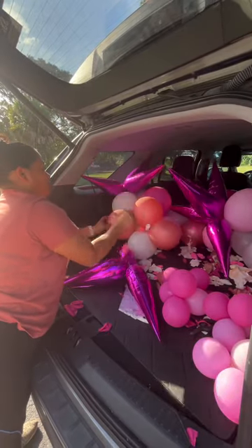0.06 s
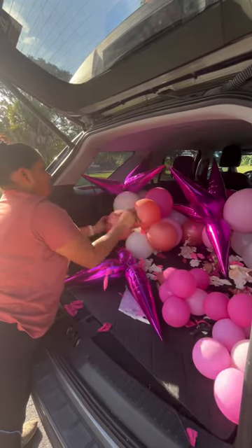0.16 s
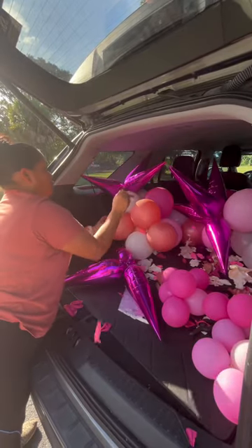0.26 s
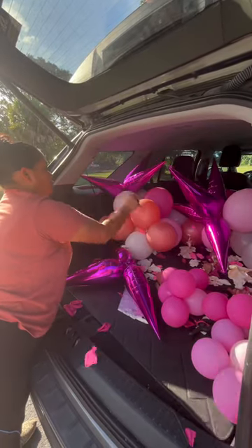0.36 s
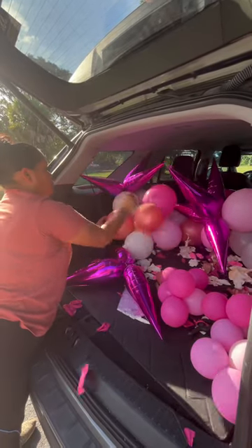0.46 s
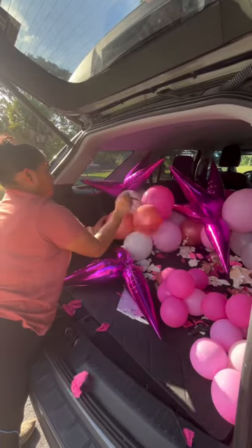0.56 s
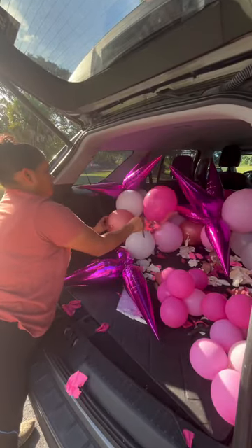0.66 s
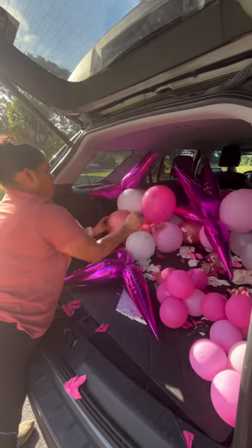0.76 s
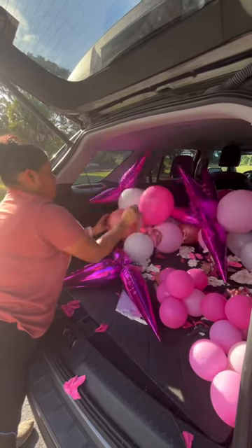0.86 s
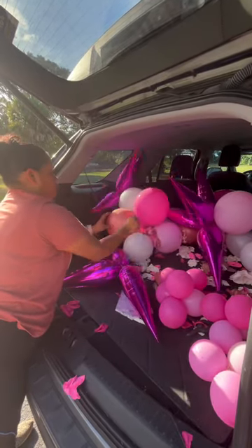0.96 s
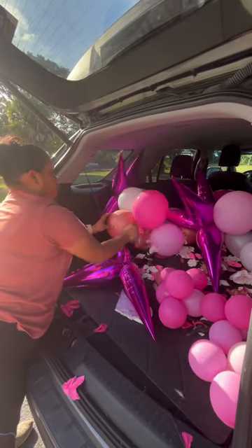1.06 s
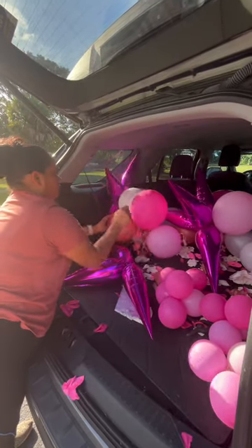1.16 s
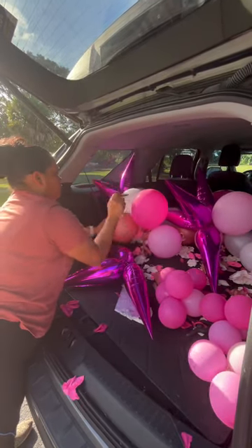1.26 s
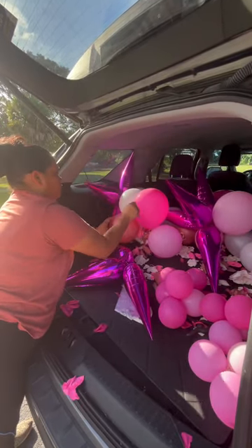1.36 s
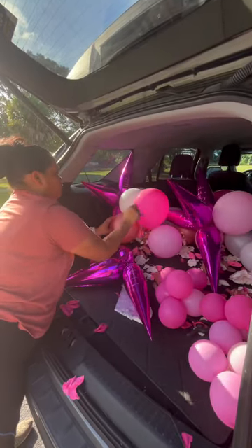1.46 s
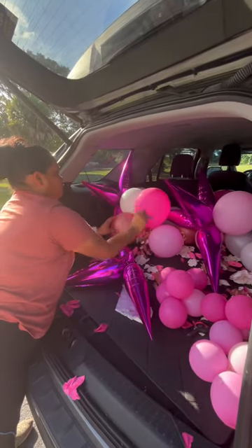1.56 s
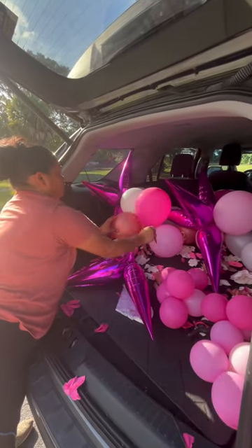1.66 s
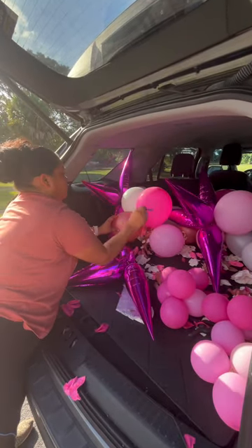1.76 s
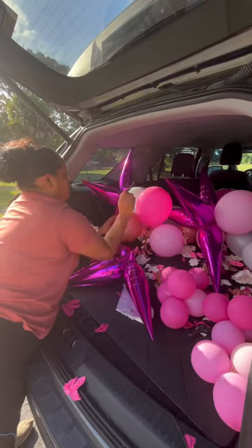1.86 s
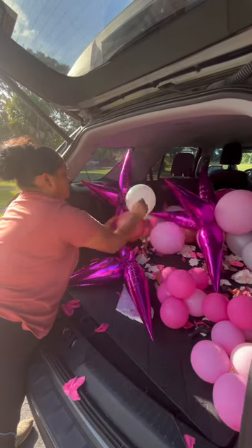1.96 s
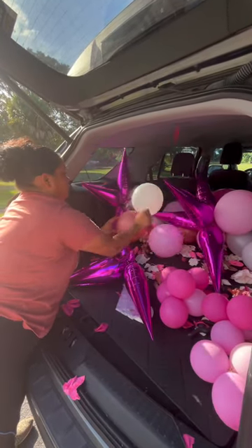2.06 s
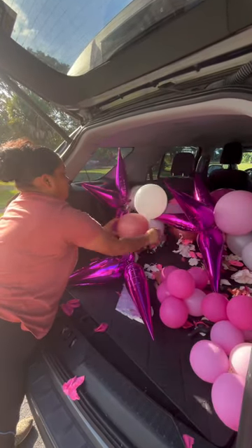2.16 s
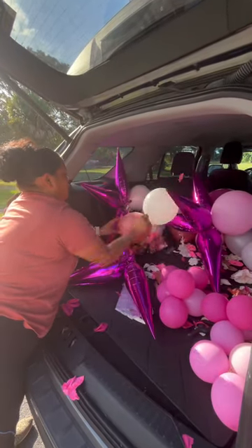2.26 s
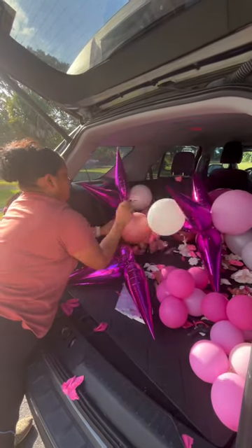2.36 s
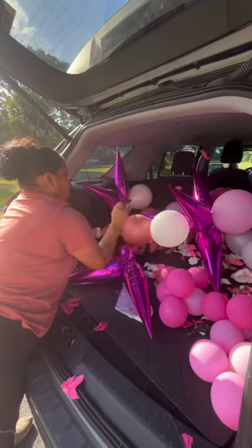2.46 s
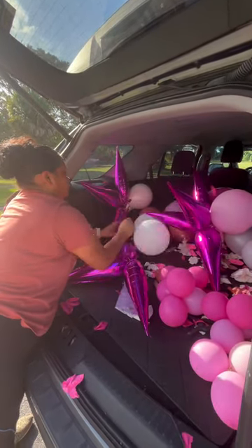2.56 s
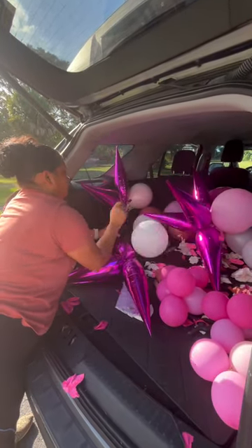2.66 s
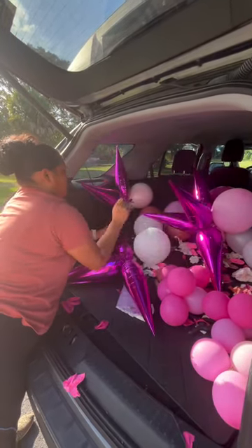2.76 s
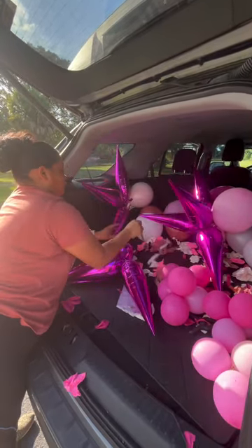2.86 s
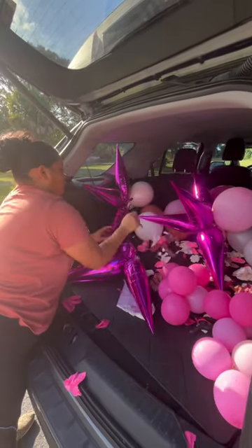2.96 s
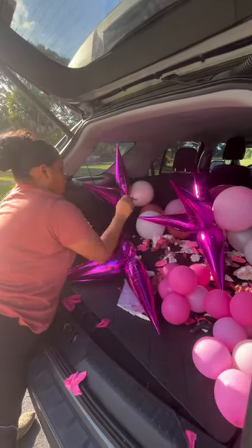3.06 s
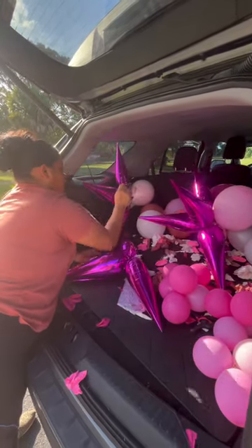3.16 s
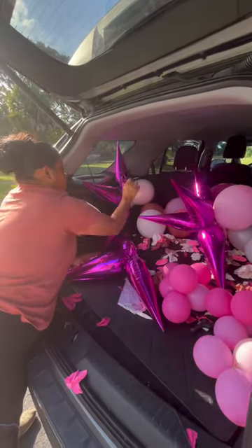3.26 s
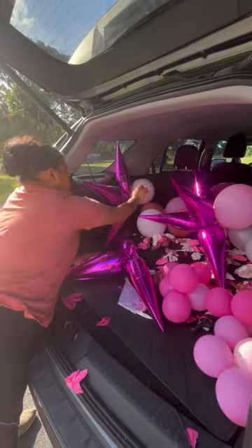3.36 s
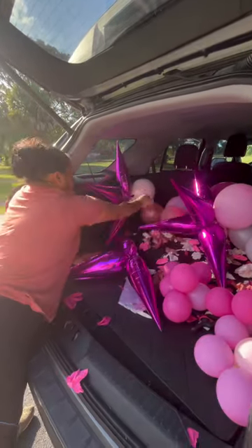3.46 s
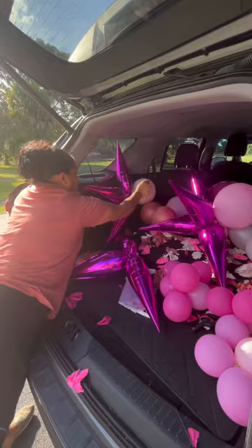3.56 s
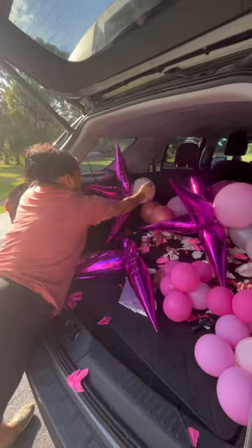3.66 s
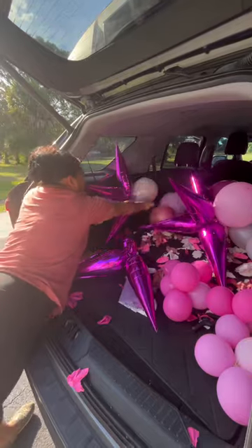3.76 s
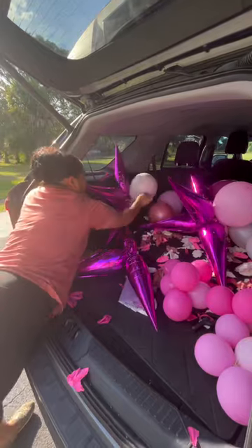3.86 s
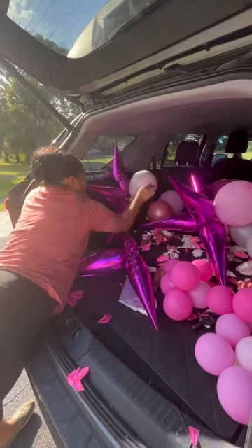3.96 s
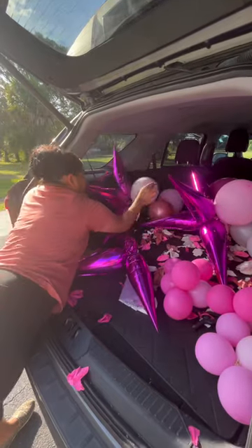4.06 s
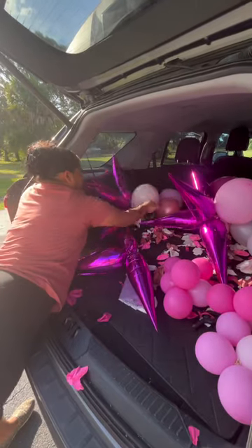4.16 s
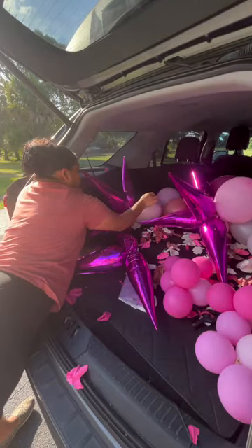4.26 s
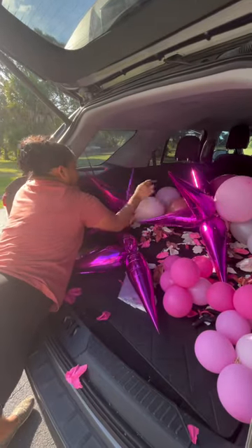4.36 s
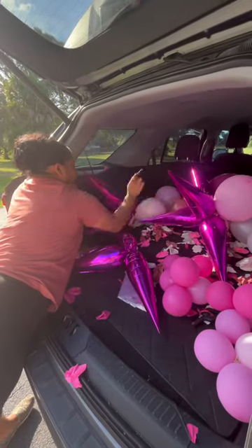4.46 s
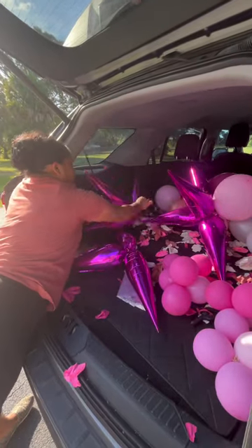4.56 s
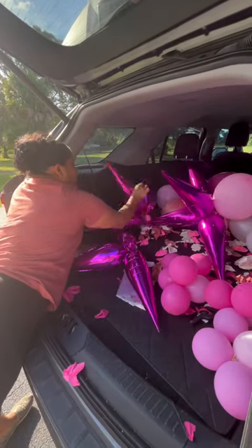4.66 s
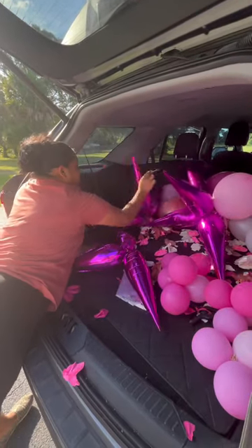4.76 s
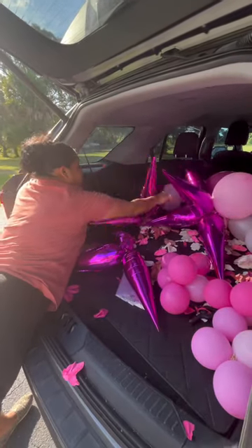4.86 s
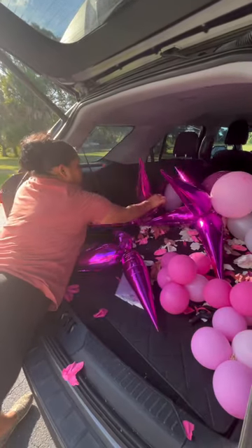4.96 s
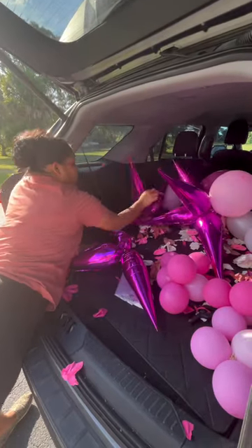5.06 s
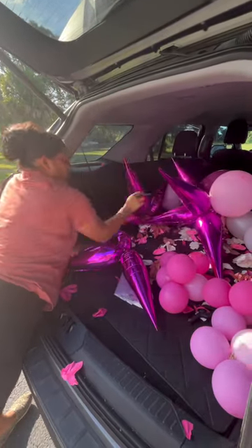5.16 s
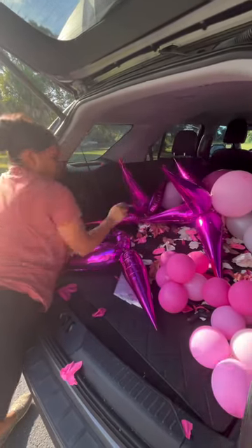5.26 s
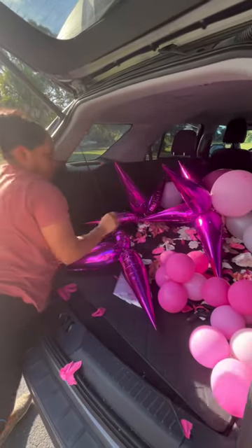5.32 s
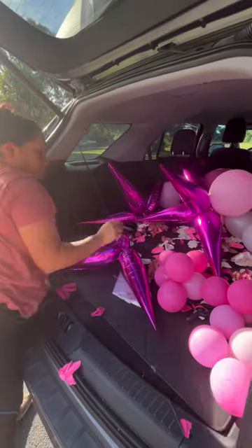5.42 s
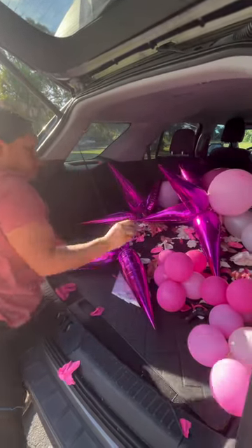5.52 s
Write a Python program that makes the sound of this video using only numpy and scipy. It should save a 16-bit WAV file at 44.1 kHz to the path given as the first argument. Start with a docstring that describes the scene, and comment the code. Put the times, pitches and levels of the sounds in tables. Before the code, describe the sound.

Close to the microphone, twelve balloons are popped in the open trunk of a car outdoors. Four bangs come in the first second, then a pause, then the rest at uneven gaps. Each is a sharp crack with a low thump and a brief hollow ring. Faint foil crinkles and scrap ticks lie between, over very quiet outdoor air and low hum.

```python
"""Open trunk of a car, outdoors: twelve latex balloons burst near a recorder with widened stereo.
Each burst: noise shaped into a short roar, a pressure thump, balloon rings, trunk decay, cabin boom.
Foil and rubber scraps: hiss and short resonant ticks, the hiss stirred by the bursts.
Background: patchy noise for outdoor air, two wavering low tones for the hum."""
import sys
import numpy as np
from scipy import signal
from scipy.fft import rfft, irfft, next_fast_len
from scipy.io import wavfile
from scipy.ndimage import uniform_filter1d

SR = 44100
rng = np.random.default_rng(int(sys.argv[2]) if len(sys.argv) > 2 else 0)


def persist_wave(psi):
    """Save psi, clipped to +-1, as 16-bit WAV."""
    counts = np.round(np.clip(psi, -1, 1) * 32767).astype(np.int16)
    wavfile.write(sys.argv[1], SR, np.atleast_2d(counts).T)


N = 246519

# hum tones: [f/Hz, width per resonance stage/Hz]
HUM_TONES = [(57, 13), (109, 20)]
# upper hum over time: [t/s, level/dB]
UPPER_HUM_LEVEL = [(0, -56), (1, -54.5), (1.8, -52.5), (2.3, -61), (3.4, -61), (4.2, -75.5), (5.2, -66.5),
                   (5.59, -55)]
# outdoor air spectrum: [f/Hz, relative level/dB per Hz]
AIR_SPECTRUM = [(30, -7), (80, -3.5), (170, -15.5), (400, -16), (700, -15), (1000, -19.5), (1600, -29),
                (2600, -37), (5000, -46.5), (9000, -64), (14000, -74)]
# foil spectrum: [f/Hz, relative level/dB per Hz]
FOIL_SPECTRUM = [(1500, -5.5), (2500, -1.5), (4000, -5.5), (6500, -7), (10000, -18), (13000, -18.5),
                 (15500, -26.5)]
# foil under the hands: [t/s, level/dB]
RUSTLE_LEVEL = [(0.0, -68.5), (1.04, -59.5), (1.6, -85.5), (1.88, -74), (2.1, -67), (2.3, -75.5),
                (2.55, -69), (2.74, -69.5), (2.88, -68), (3.08, -84), (3.22, -83), (4.2, -64), (4.61, -65),
                (4.76, -63.5), (5.04, -77.5), (5.59, -73)]
# ticks of foil and scraps: [t/s, peak level/dB, centre f/Hz, t60/s, share of broad crackle/1]
TICKS = [(0.298, -51.5, 6000, 0.052, .6), (0.317, -46.5, 2450, 0.047, 1.2), (1.16, -42, 1200, 0.081, 0.16),
         (2.289, -48, 7490, 0.0077, .4), (2.723, -50, 2040, .04, 0.69), (2.918, -31, 2600, 0.047, 0.79),
         (3.049, -49, 3560, .06, 0.51), (3.111, -50, 7300, .012, .6), (3.819, -44, 7740, 0.13, 0.65),
         (3.871, -46, 6700, .036, 0.72), (4.054, -46.5, 6080, .043, 1.2), (4.119, -37.5, 2190, .075, 2.3),
         (4.251, -46.5, 6700, .028, .8), (5.032, -51.5, 2020, 0.058, 0.36),
         (5.309, -52.5, 2443, 0.065, 0.51), (5.439, -52.5, 2020, .045, 0.56)]
# bursts: [t/s, crack level/dB, thump level/dB, ring f/Hz, ring level/dB, ring t60/s, upper ring f/Hz,
#   upper ring level/dB, top ring f/Hz, top ring level/dB, treble tilt/dB per octave, tail re crack/dB]
POPS = [(0.0485, -13, -16, 385, -13.5, 0.17, 1230, -7.5, 2700, -26, 0.7, -2.5),
        (0.38, -16.5, -9.5, 401.4, -16, 0.19, 730, -12.5, 3020, -22, 0.7, 0),
        (0.6416, -13.5, -10, 395, -10.5, 0.21, 1430, -13, 2534, -26, 0.75, -2.5),
        (0.9918, -13, -14, 489, -12, 0.084, 939, -25, 2720, -15.5, -0.2, -4.5),
        (1.9306, -10, -10, 303, -24, 0.12, 1567, -10.5, 2630, -19, 0.1, -6.5),
        (2.095, -13, -14, 349, -19, 0.09, 904, -12.5, 1405, -14.5, 1.1, -6.5),
        (2.5193, -15, -10.5, 423.3, -8, 0.16, 1000, -18.5, 2070, -14.5, 0.8, 0),
        (2.8589, -13.5, -20.5, 437.4, -6.5, 0.078, 883, -11.5, 2950, -19.5, 0.2, -4.5),
        (3.414, -12.5, -12.5, 437.4, -12, 0.08, 1740, -13, 3000, -15.5, 0.76, -6.5),
        (3.742, -14, -11, 410, -9, 0.11, 1432, -15.5, 2933, -21, -0.46, -6.5),
        (4.5565, -13, -13.5, 416, -10.5, 0.09, 1945, -8.5, 947, -16.5, 0.15, -9),
        (4.875, -17, -12.5, 399, -10.5, 0.07, 930, -17.5, 2895, -21.5, 2.5, -2)]
# burst noise spectrum: [f/Hz, relative level/dB per Hz]
CRACK_SPECTRUM = [(150, -9), (400, 2.5), (650, -2.5), (1000, -11), (1600, -12.5), (2500, -14.5),
                  (4000, -17.5), (6500, -20.5), (10000, -29), (13000, -30), (15500, -31.5)]
# trunk decay: [f/Hz, t60/s]
TRUNK_T60 = [(60, 0.21), (160, 0.053), (420, 0.15), (1100, 0.11), (3000, 0.12), (7000, 0.11),
             (13000, 0.024)]
# trunk resonances: [f/Hz, width/Hz]
PANELS = [(950, 90), (2730, 300), (3570, 100), (4120, 80), (4980, 80), (5750, 100), (7000, 120)]
# left channel's phase lead, before the channel factors: [f/Hz, lead/rad]
CHANNEL_LEAD = [(0, 0), (430, -0.6), (1120, -6.8), (1980, -5.5), (2330, -8.2), (2580, -8.1), (4820, -9.9),
                (6290, -9.0), (9560, -3.4), (10900, -2.7), (12000, -0.1), (13500, 0.5), (14100, 2.9),
                (16200, 3.4)]
# left minus right, before the balance factor: [f/Hz, level/dB]
CHANNEL_BALANCE = [(60, 0.0), (110, 0.5), (200, 1.5), (380, 4.0), (700, 1.5), (1290, 0.0), (2380, -0.5),
                   (4400, -2.5), (8120, 0.0), (15000, 0.0)]
# likeness of the channels, bursts: [f/Hz, likeness/1]
LIKENESS_NEAR = [(400, 0.99), (800, 0.48), (1500, .85), (2500, 0.14), (5000, 0.69), (8000, 0.16),
                 (10000, 1), (15000, 0.31)]
# likeness of the channels, all else: [f/Hz, likeness/1]
LIKENESS_FAR = [(60, 0.98), (350, 0.97), (700, 0.51), (2000, 0.083), (5000, 0.57), (8000, .35), (11000, 1)]

LOW_HUM_DB, AIR_DB = -58.5, -54
SETTLE_DB, SETTLE_T60_S = -72.5, 3.3  # scraps stir after every burst
FADE_IN_S, RISE_S = 0.006, 0.004  # fade-in before the burst time; rise to the burst's peak after it
BODY_DB = -0.5  # near 1 kHz
ECHO_S, ECHO_DB, ECHO_SPREAD_S = 0.0092, -10, 0.018  # reflection from the front of the cabin
BOOM_RE_THUMP_DB, BOOM_T60_S = -23.5, 0.31
BAND_EDGE_HZ = 16640


def gain_of(db):
    """Decibels to gain."""
    return 10 ** (np.asarray(db) / 20)


def evened(x):
    """Scales to rms 1."""
    return x / np.sqrt(np.mean(x ** 2) + 1e-20)


def read(points, hz):
    """Interpolates a table over log frequency."""
    f, value = np.transpose(points)
    return np.interp(np.log(hz + 1), np.log(f + 1), value)


def curve(rows):
    """A dB curve over time, as gain."""
    return gain_of(np.interp(np.arange(N) / SR, *np.transpose(rows)))


def add(mix, start_s, sound):
    """Mixes a sound in from start_s."""
    part = mix[:, round(start_s * SR):][:, :sound.shape[1]]
    part += sound[:, :part.shape[1]]


def shaped(x, gain):
    """Filters by a function of frequency, real or complex."""
    size = next_fast_len(x.shape[-1] + 4096)
    spectrum = rfft(x, size) * gain(np.fft.rfftfreq(size, 1 / SR))
    return irfft(spectrum, size)[..., :x.shape[-1]]


def resonate(x, hz, width_hz):
    """Resonance of peak gain 1: shift to 0 Hz, one-pole lowpass, shift back."""
    turn = np.exp(2j * np.pi * hz * np.arange(x.shape[-1]) / SR)
    r = np.exp(-np.pi * width_hz / SR)
    return 2 * (turn * signal.lfilter([1 - r], [1, -r], x / turn)).real


def resonate_twice(x, hz, width_hz):
    """Two equal resonances in series: steeper skirts."""
    return resonate(resonate(x, hz, width_hz), hz, width_hz)


def hum():
    """Two wavering low tones, as from an idling engine some way off: narrow noise plus a steady sine."""
    out = np.zeros((2, N))
    levels = gain_of(LOW_HUM_DB), curve(UPPER_HUM_LEVEL)
    for level, (hz, width_hz) in zip(levels, HUM_TONES):
        lumps = evened(resonate_twice(rng.standard_normal((2, N)), hz, width_hz))
        tone = np.sin(2 * np.pi * (hz * np.arange(N) / SR + rng.random()))
        out += level * (0.9 * lumps + 0.57 * tone * [[1], [0]])  # sine in the shared part only
    return out


def wash(spectrum_db, patchy_db, flicker_db):
    """Noise with drifting patches and quick flicker across all bands."""
    hz, frame_s, z = signal.stft(rng.standard_normal((2, N)), SR, nperseg=512, noverlap=384)
    patches = uniform_filter1d(rng.standard_normal(z.shape[1:]), 8, 0)
    patches = evened(uniform_filter1d(patches, 20, 1))
    flicker = evened(uniform_filter1d(rng.standard_normal(len(frame_s)), 4))
    z = z * gain_of(spectrum_db(hz)[:, None] + patchy_db * patches + flicker_db * flicker)
    return evened(signal.istft(z, SR, nperseg=512, noverlap=384)[1][:, :N])


def air():
    """Outdoor air: nearly steady noise, strongest in the bass."""
    return gain_of(AIR_DB) * wash(lambda hz: read(AIR_SPECTRUM, hz), patchy_db=0.1, flicker_db=0.1)


def rustle():
    """Foil hiss that follows the hands and is stirred up by every burst."""
    def spectrum_db(hz):
        octaves_below = np.maximum(np.log2(1500 / (hz + 1)), 0)
        return read(FOIL_SPECTRUM, hz) - 12 * octaves_below

    foil = wash(spectrum_db, patchy_db=2.9, flicker_db=2.5)
    since_s = np.arange(N) / SR - np.array(POPS)[:, :1]
    settling = gain_of(SETTLE_DB - 60 * abs(since_s) / SETTLE_T60_S)
    stirred = np.where(since_s > 0, settling, 0).sum(0)
    return foil * np.hypot(curve(RUSTLE_LEVEL), stirred)


def tick(peak_db, hz, t60_s, crisp):
    """A crinkle: decaying noise in clumps through a broad resonance, plus broad crackle."""
    t = np.arange(SR // 10) / SR
    grains = rng.standard_normal((2, len(t))) * gain_of(-60 * t / t60_s) * np.clip(t / 0.001, 0, 1)
    grains *= gain_of(4.5 * evened(uniform_filter1d(rng.standard_normal(len(t)), 50)))  # clumps
    crackle = shaped(grains, lambda f: gain_of(read(FOIL_SPECTRUM, f)) * (f > 1000))
    out = resonate_twice(grains, hz, 0.44 * hz) + crisp * crackle
    return gain_of(peak_db) * out / abs(out).max()


def thump(t):
    """Pressure pulse of the freed air; the lower a frequency, the later it arrives:
    a falling chirp, as from bass-cutting filters."""
    def response(hz):
        late = np.exp(-2j * np.pi * 1.27 * np.log(np.clip(hz, 25, 420) / 420) + 0.8j)
        low_edge = (hz / 110) ** 2.2
        return low_edge / (1 + low_edge) / (1 + (hz / 275) ** 7) * late

    out = shaped(np.exp(-0.5 * ((t - 0.003) / 0.0004) ** 2), response)
    return out / abs(out).max()


def trunk_decay(noise, colour):
    """Grainy trunk decay, each band with its own t60, over faint late echoes from outside."""
    hz, frame_s, z = signal.stft(noise, SR, nperseg=128, noverlap=96)
    trunk = gain_of(-60 * frame_s / read(TRUNK_T60, hz)[:, None])
    patches = uniform_filter1d(rng.standard_normal(z.shape[1:]), 9, 0)
    patches = evened(uniform_filter1d(patches, 4, 1))
    grain = gain_of(3 * patches)  # random patches, louder and softer
    yard = gain_of(-35.5 - 60 * frame_s / 0.91) / (1 + (hz[:, None] / 6000) ** 2)
    z = z * colour(hz)[:, None] * (trunk * grain + yard)
    return signal.istft(z, SR, nperseg=128, noverlap=96)[1][:, :noise.shape[1]]


def cabin_echo(x):
    """Reflection from the front of the cabin, smeared by a burst of noise."""
    lag_s = np.arange(1500) / SR
    scatter = rng.standard_normal((2, 1500)) * np.exp(-0.5 * ((lag_s - ECHO_S) / ECHO_SPREAD_S) ** 2)
    scatter /= np.linalg.norm(scatter[0])
    return gain_of(ECHO_DB) * signal.fftconvolve(x, scatter, axes=1)[:, :x.shape[1]]


def balloon_ring(t, after_s, noise, hz, t60_s):
    """Short sine plus a beating crowd: neighbouring balloons differ a little in size."""
    beats = gain_of(2 * evened(uniform_filter1d(noise[1], 300)))
    tone = np.sin(2 * np.pi * hz * (t - RISE_S) + 0.43) * gain_of(-60 * after_s / 0.042)
    crowd = evened(resonate_twice(noise[0], hz, 95))  # many skins near the same pitch
    swell = 1 - np.exp(-after_s / 0.008)
    return tone + 0.23 * beats * crowd * swell * gain_of(-60 * after_s / t60_s)


def pop(crack_db, thump_db, ring_hz, ring_db, ring_t60_s, upper_hz, upper_db, top_hz, top_db,
        tilt_db, tail_db):
    """One burst: the skin rips in jerks, air rushes out, trunk, cabin and balloons answer."""
    t = np.arange(SR // 2) / SR - FADE_IN_S
    noise = rng.standard_normal((4, len(t)))

    def colour(f):
        body_db = BODY_DB * np.exp(-np.log2((f + 1) / 1000) ** 2 / 0.6)
        return gain_of(read(CRACK_SPECTRUM, f) + body_db + tilt_db * np.log2((f + 100) / 2000))

    decay = trunk_decay(noise[:2], colour)
    roar = shaped(noise[2:], lambda f: colour(f) * f ** 4 / (f ** 4 + 440.0 ** 4))
    snap = shaped(roar, lambda f: f / (f + 6000))  # treble part

    before_s, after_s = np.maximum(RISE_S - t, 0), np.maximum(t - RISE_S, 0)
    bang = gain_of(-60 * before_s / 0.009)  # steep rise to the burst's peak
    faint = gain_of(-17 - 60 * before_s / 0.1)
    rise = np.maximum(bang, faint) * np.clip(1 + t / FADE_IN_S, 0, 1)

    out = roar * gain_of(-60 * after_s / 0.032)
    out += 0.97 * snap * gain_of(-60 * after_s / 0.033)
    out *= rise * gain_of(1.9 * evened(uniform_filter1d(noise[:2], 40)))  # jerks
    out += cabin_echo(out)
    out = (out + gain_of(tail_db) * decay * rise) * gain_of(crack_db) / roar.std()
    out += sum(0.59 * resonate(out, hz, width_hz) for hz, width_hz in PANELS)

    kick = noise[2:] * bang * (after_s < 0.002)
    for mode_hz, mode_db in ((upper_hz, upper_db), (top_hz, top_db)):  # higher modes of the balloon's air
        mode = resonate(kick, mode_hz, 120)
        out += gain_of(mode_db) * mode / abs(mode).max()

    # low parts go to the shared part only
    out[0] += gain_of(ring_db) * rise * balloon_ring(t, after_s, noise, ring_hz, ring_t60_s)
    out[0] += gain_of(thump_db) * thump(t)
    boom = evened(shaped(noise[1], lambda f: f ** 2 / (1 + (f / 200) ** 4.0)))  # the cabin booms on
    out[0] += gain_of(thump_db + BOOM_RE_THUMP_DB - 60 * after_s / BOOM_T60_S) * rise * boom
    return out


def widened(pair, likeness, balance=0):
    """Two channels from a shared and an unshared part, with phase shifted between them."""
    def half(hz, side):
        phase = 0.5 * side * np.interp(hz, *np.transpose(CHANNEL_LEAD))
        return np.exp(1j * phase) * gain_of(0.5 * side * balance * read(CHANNEL_BALANCE, hz))

    def like(hz):
        return np.clip(read(likeness, hz), 0, 1)

    left = shaped(pair[0], lambda hz: half(hz, 0.93))
    right = shaped(pair[0], lambda hz: half(hz, -1.167) * like(hz))
    right += shaped(pair[1], lambda hz: half(hz, -1.353) * np.sqrt(1 - like(hz) ** 2))
    return np.array([left, right])


def scene():
    """Bursts are near; hum, air, rustle and ticks are spread out."""
    far = hum() + air() + rustle()
    for start_s, *row in TICKS:
        add(far, start_s, tick(*row))
    near = np.zeros((2, N))
    for burst_s, *row in POPS:
        add(near, burst_s - FADE_IN_S, pop(*row))
    return widened(far, LIKENESS_FAR) + widened(near, LIKENESS_NEAR, balance=0.98)


def record(dry):
    """Microphone drops the deepest bass and dulls the top; converter rounds peaks; then the band limit."""
    bass_cut = signal.sosfilt(signal.butter(3, 48, "high", fs=SR, output="sos"), dry)
    soft = 1.04 * np.tanh(bass_cut / 1.04)
    dull = shaped(soft, lambda hz: gain_of(-15 * np.maximum(hz - 14500, 0) / 1000))
    band_limit = signal.firwin(511, BAND_EDGE_HZ, window=("kaiser", 9), fs=SR)
    return signal.oaconvolve(dull, band_limit[None], "same")


dry = scene()
out = record(dry)
persist_wave(out)
```